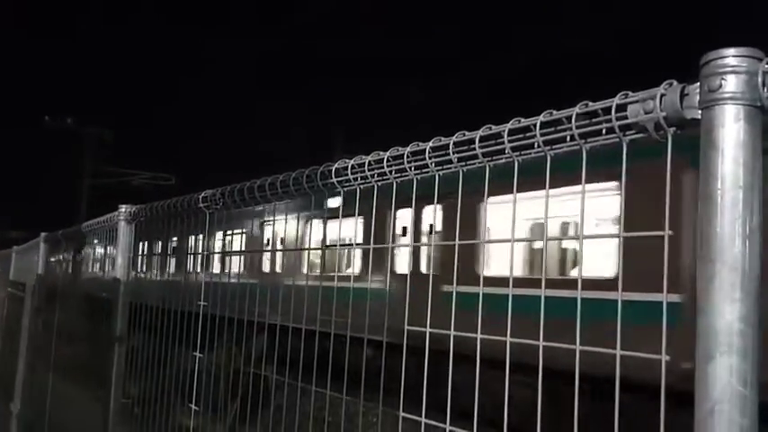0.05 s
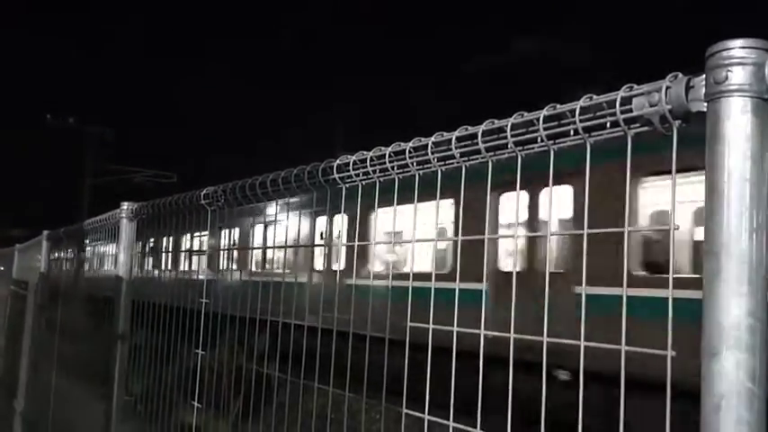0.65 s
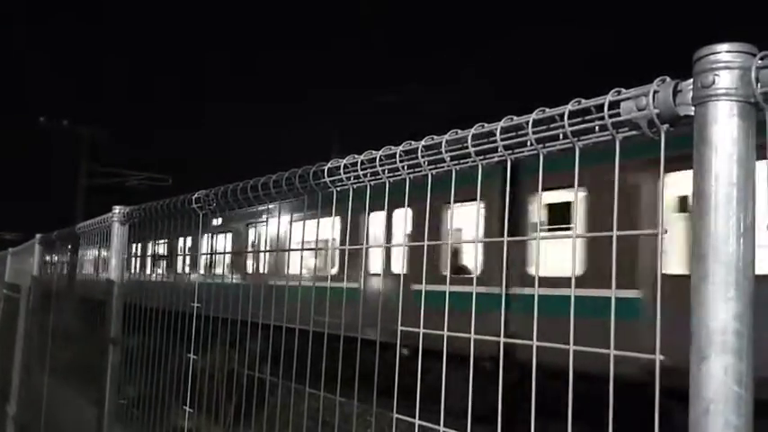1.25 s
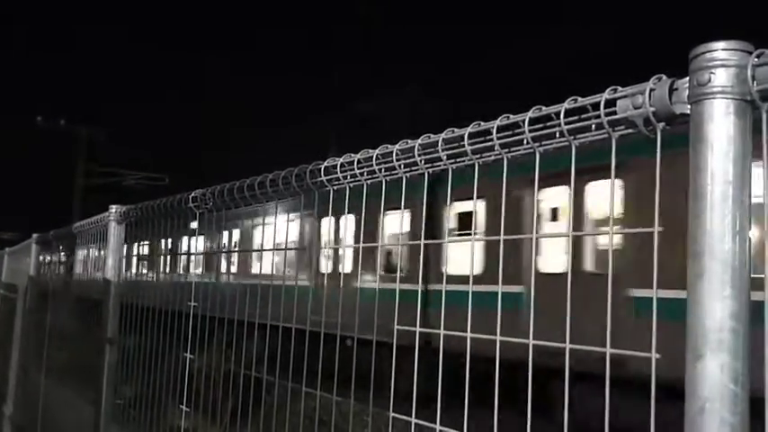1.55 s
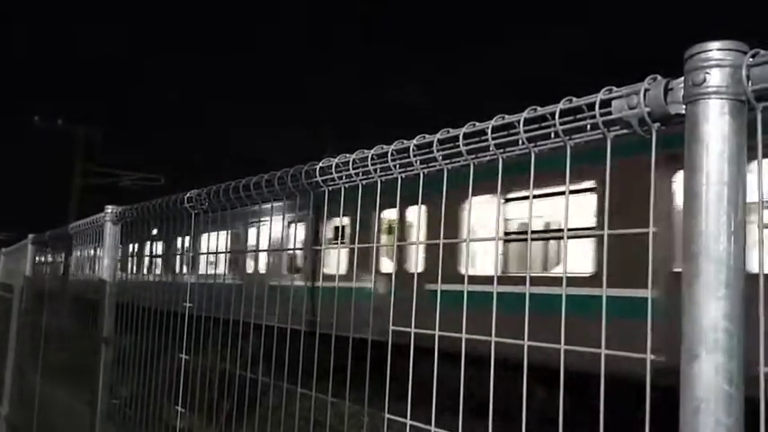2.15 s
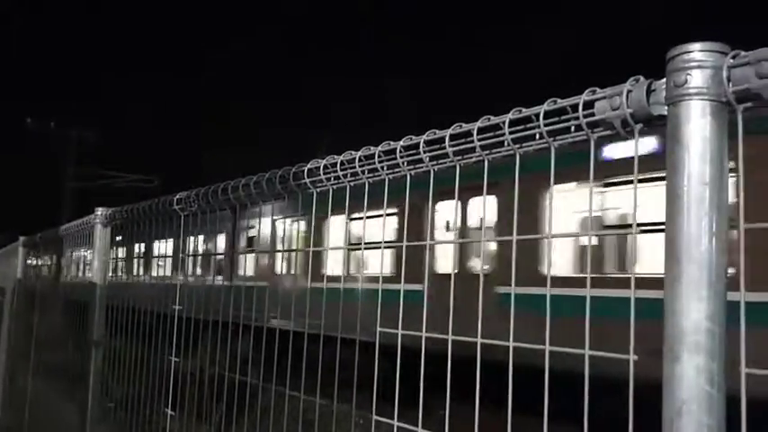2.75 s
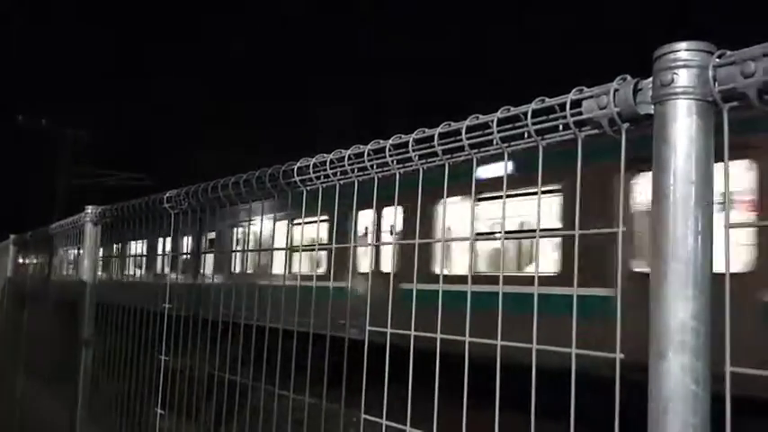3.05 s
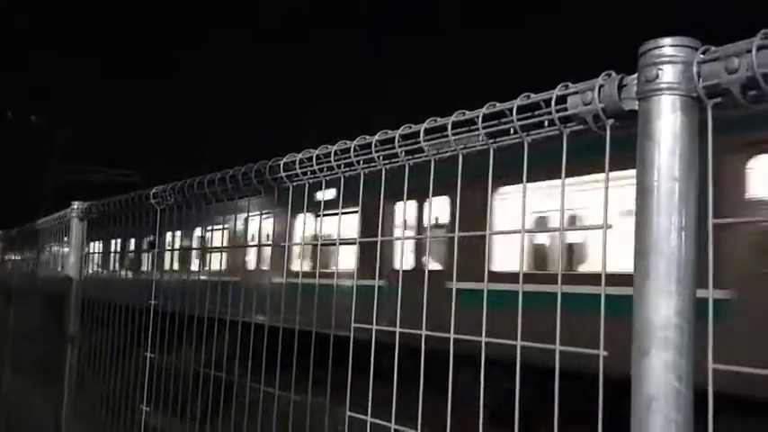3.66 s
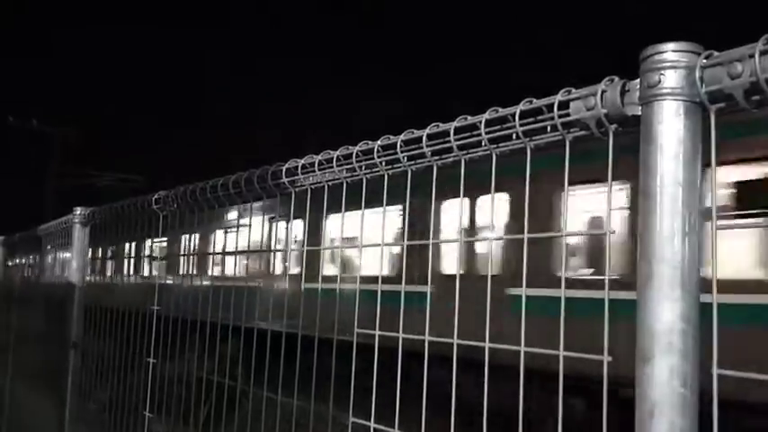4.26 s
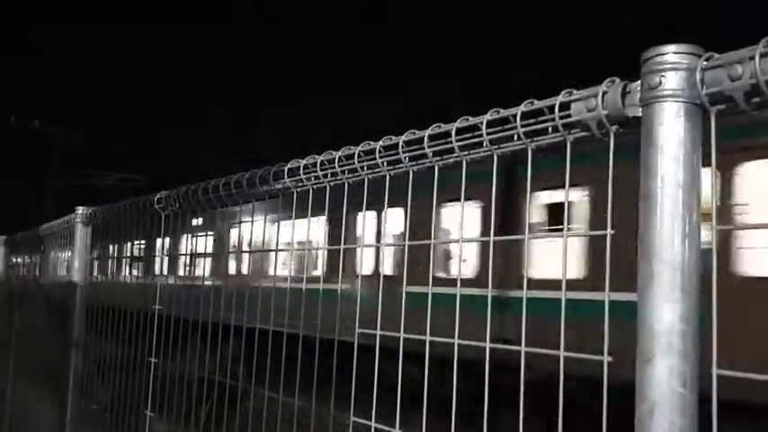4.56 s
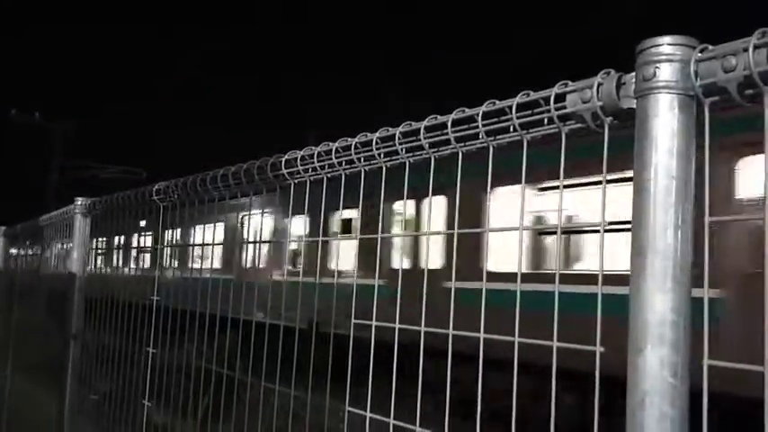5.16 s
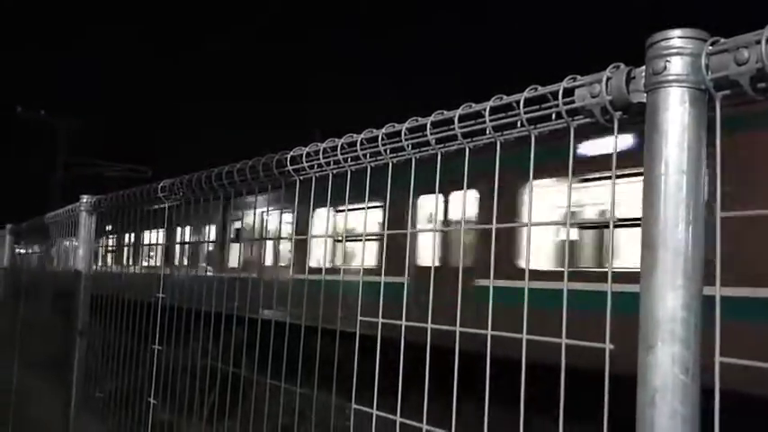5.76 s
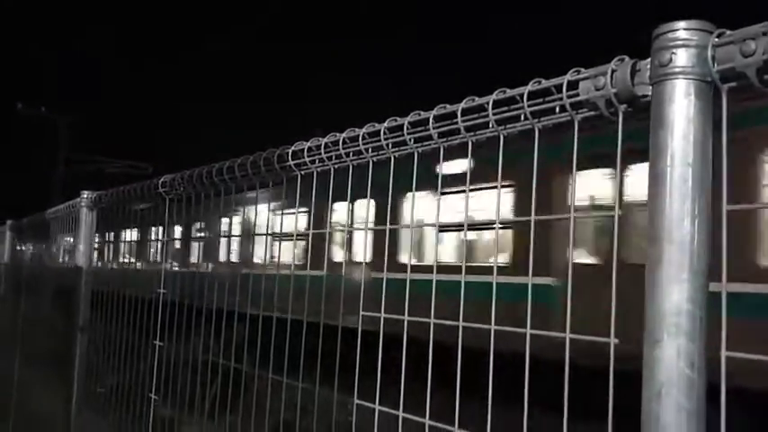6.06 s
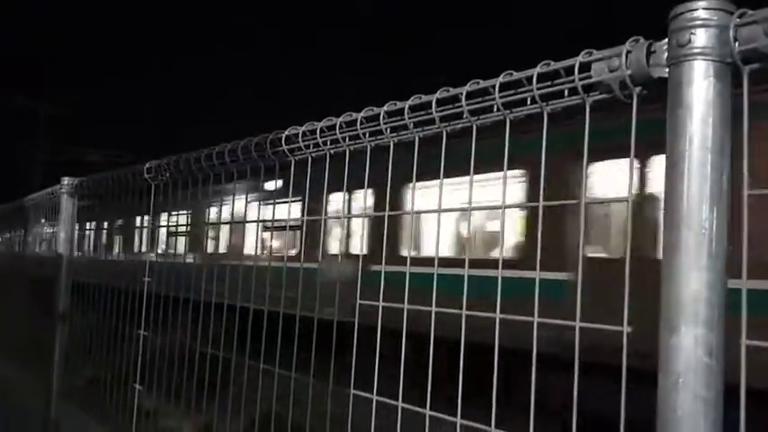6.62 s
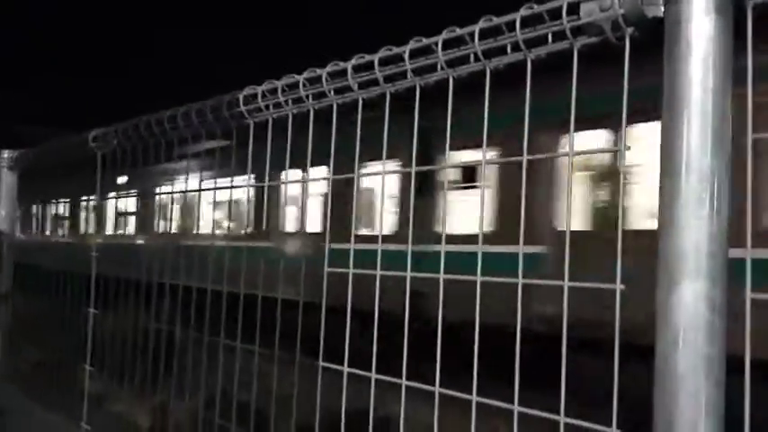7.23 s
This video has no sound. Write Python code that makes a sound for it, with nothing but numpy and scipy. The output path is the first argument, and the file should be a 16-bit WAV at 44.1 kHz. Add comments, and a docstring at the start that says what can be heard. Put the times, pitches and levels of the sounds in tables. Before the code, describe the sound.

Whining motors, rolling rumble and steel hiss from a passing commuter train gathering speed, its wheels thudding and clanking over joints ever harder.

```python
"""Night, a mono microphone at a wire fence; a few metres beyond it an electric commuter train pulls away.
First the gears whine and the motors sing with the inverter, over the rumble, ring and hiss of rolling.
Then, as the train gathers speed, the gear whine climbs and fades and the roar of the rail grows.
All along, wheels drop over rail joints with a thud, a clank and a spray of steel hiss; by the end
the blows come thicker and harder."""
import sys
import numpy as np
from scipy import signal
from scipy.fft import rfft, irfft, next_fast_len
from scipy.io import wavfile

SR = 44100
rng = np.random.default_rng(int(sys.argv[2]) if len(sys.argv) > 2 else 0)


def generate_wav(sig):
    """Save sig (samples, or channels by samples) to the path in sys.argv[1] as 16-bit PCM at SR."""
    pcm = np.round(np.clip(np.atleast_2d(sig).T, -1, 1) * 32767).astype(np.int16)
    wavfile.write(sys.argv[1], SR, pcm)


N = 330309
T = np.arange(N) / SR

# The train pulling away. Each row: time in seconds, speed in m/s.
TRAIN_SPEED = [(0, 4.41), (1.15, 4.91), (3.55, 6.3), (5.8, 7.8), (7.49, 8.97)]
# Bogies crossing a joint. Each row: first axle's time in seconds, thud, clank and hiss in relative dB,
# thud pitch in Hz, dB added to the second axle's thud and clank.
BOGIE_CROSSINGS = [(-.101, -19, -33, -39.5, 242, 1.5), (1.245, -19, -29, -32, 209, -1),
                   (2.636, -26, -40, -34, 176, 2), (3.694, -15.5, -25, -31.5, 179, 0),
                   (3.936, -34, -46, -40, 171, 4), (4.633, -19, -26.5, -29.5, 170, 1.5),
                   (4.812, -27.5, -43.5, -34, 213, 2), (5.668, -22.5, -33.5, -32, 189, -1.5),
                   (6.494, -12.5, -24.5, -28.5, 175, 0.5), (7.243, -14, -22, -31, 176, -4)]
# Lone dull knocks under the cars. Each row: time in seconds, thud and hiss in dB, thud pitch in Hz.
LONE_KNOCKS = [(1.886, -30, -37, 192), (4.382, -33.5, -35, 227.5), (6.194, -26.5, -34.5, 173),
               (6.688, -34, -34.5, 188), (7.049, -21.5, -40, 188), (7.39, -23, -33.5, 215.3)]
# A struck bogie and rail. Each row: mode in Hz, seconds to fall 60 dB, relative level in dB.
CLANK_MODES = [(249.6, 0.091, 3.5), (379, 0.092, -3.5), (436, 0.057, 1.5), (519, 0.067, 0),
               (576, 0.064, -2.5), (683, 0.045, 0), (771, .06, -7), (875, 0.034, -12.5),
               (1095, 0.11, -15.5), (1265, 0.055, -12.5), (1383, 0.11, -14.5), (1580, 0.047, -14.5),
               (2360, 0.085, -24), (2688, 0.18, -17)]
# Rolling between joints. Each row: time in seconds, rumble and hiss in relative dB.
ROLLING_LEVELS = [(0, -32, -33), (1, -32.5, -35), (1.9, -32, -36), (2.5, -34.5, -37), (3.4, -30, -36.5),
                  (4.6, -28.5, -36.5), (5.6, -29.5, -36), (6.4, -28, -34), (7.49, -29, -32.5)]
# Noise colours as heard at the fence. Each row: frequency in Hz, relative spectral density in dB.
RUMBLE_SPECTRUM = [(12, -43), (20, -6.5), (59, -3.5), (113, 3.5), (147, -1.5), (224, -4.5), (330, -16),
                   (430, -47), (730, -120)]
ROAR_SPECTRUM = [(200, -10), (330, -2.5), (430, 1), (600, -1.5), (760, -10), (950, -10), (1250, -19),
                 (2000, -35.5)]
HISS_SPECTRUM = [(1410, -41), (2400, -6.5), (2490, -10.5), (2740, -3.5), (3390, -7.5), (3820, -1),
                 (4120, -2.5), (4490, -1.5), (4870, -0.5), (5450, -3), (7360, -13.5), (7750, -28),
                 (8110, -8.5), (10500, -63), (17800, -120)]
SHUDDER_SPECTRUM = [(80, -20.5), (140, -3), (200, 4.5), (250, -0.5), (330, -10), (700, -18)]
SPRAY_SPECTRUM = [(900, -8), (2000, -6), (3200, -4.5), (4000, 3), (4900, 3), (5450, 5.5),
                  (6500, -3.5), (7500, -10), (8000, -25.5)]
FAN_SPECTRUM = [(520, -0.5), (700, -4), (950, -2), (1250, -4.5), (1500, -12.5)]
# The wheels' steady ring. Each row: resonance in Hz, width in Hz, relative level in dB.
WHEEL_MODES = [(1140, 65, 1), (1453, 66, -3), (1705, 310, -3), (2063, 89, 0.5), (2870, 92, -8.5),
               (2844, 53, 0.5)]
# Gearboxes passing the microphone. Each row: closest moment in seconds, level in dB.
GEARBOX_PASSES = [(0.221, -39), (.58, -40.5), (1.1, -43), (2.35, -45), (3.5, -46.5), (4.15, -47),
                  (6.149, -50), (6.6, -56)]
# Lesser whines of the drives. Each row: peak time and spread in seconds, pitch in Hz, glide in Hz/s,
# level in dB.
DRIVE_WHINES = [(.5, 0.29, 618, 4, -36), (0.801, .5, 890, 8, -48.5), (2.5, 0.57, 660, 35, -50.5),
                (6.7, .9, 709, 56, -47), (7.49, 0.14, 1634, 15, -45)]
# The inverter's switching tone. Each row: time in seconds, pitch in Hz.
INVERTER_PITCH = [(0, 1084), (.7, 1090), (1.9, 1099), (3.2, 1093), (4.2, 1123), (6.3, 1109), (7.2, 1193)]
# Motors passing. Each row: closest moment in seconds, then tone, sidebands and upper tones in dB.
PASSING_MOTORS = [(.25, -34, -38, -41.5), (1.85, -44, -38.5, -46.5), (3.2, -55, -53, -60),
                  (4.7, -47, -47.5, -61.5), (7.1, -51.5, -56.5, -57)]
# Upper motor tones. Each row: multiple of the switching tone, width in Hz, relative level in dB.
UPPER_TONES = [(1.47, 188, -6.5), (2.011, 131, -1.5), (2.53, 196, -3)]
# Faint rings in the hiss. Each row: peak time and spread in seconds, pitch and width in Hz, level in dB.
HIGH_RINGS = [(.1, 0.41, 3790, 220, -48.5), (.3, .6, 5500, 304, -44), (1.7, 0.76, 4450, 260, -42.5),
              (3.3, 1.2, 4110, 196, -51), (4.8, 3.8, 1450, 85, -55), (5.5, 2.9, 5370, 137.7, -47),
              (5.6, 0.83, 4620, 260, -50), (5.6, 2.3, 1984, 151.4, -47.5), (6.82, .35, 5480, 900, -38.5),
              (7.4, .27, 1880, 121, -44.5)]


def rail_joints(thud_s=0.0068, thud_lag_s=0.0013, rebound_s=.048, rebound_db=-10):
    """Each wheel dips into the gap, bounces on the springy track and chatters against the rail end."""
    knocks, shudder, spray = np.zeros((3, N))
    contact = rng.standard_normal(N)
    blows = wheel_blows()
    chances = rng.uniform(-1, 1, (len(blows), len(CLANK_MODES) + 1))
    for (s, thud_db, clank_db, hiss_db, thud_hz), chance in zip(blows, chances):
        near = np.abs(T - s) < .5
        age = T[near] - s
        # the wheel's mass on the track's spring: a few low cycles that build and fade
        rise = np.maximum(age - thud_lag_s, 0) / (2 * thud_s)
        bounce = rise ** 2 * np.exp(2 - 2 * rise)
        knocks[near] += undb(thud_db) * bounce * np.sin(2 * np.pi * thud_hz * age + np.pi * chance[-1])
        shudder[near] += undb(thud_db - 8) * swell(age - .005, rise_s=0.031, fall_s=0.055)
        # the bogie's loose gear rattles, and again on the rebound
        rattle = swell(age, rise_s=0.013, fall_s=0.019)
        rattle += undb(rebound_db) * swell(age - rebound_s, rise_s=0.0023, fall_s=0.037)
        knocks[near] += undb(clank_db + 2.5) * clank(rattle * contact[near], detune=.04 * chance)
        spray[near] += undb(hiss_db) * swell(age - .011, rise_s=0.014, fall_s=0.05)
    return knocks + shudder * coloured(SHUDDER_SPECTRUM) + spray * coloured(SPRAY_SPECTRUM)


def wheel_blows(wheelbase_m=2.07, extra_clank_db=4.5, extra_hiss_db=4.2, knock_clank_db=-38):
    """Each bogie strikes twice, a wheelbase apart, the second time brighter; lone knocks barely ring."""
    blows = []
    for s, thud_db, clank_db, hiss_db, hz, second_db in BOGIE_CROSSINGS:
        later = s + wheelbase_m / speed(s)
        second_clank_db = clank_db + second_db + extra_clank_db
        blows.append((s, thud_db, clank_db, hiss_db, hz))
        blows.append((later, thud_db + second_db, second_clank_db, hiss_db + extra_hiss_db, hz))
    return blows + [(s, thud_db, knock_clank_db, hiss_db, hz) for s, thud_db, hiss_db, hz in LONE_KNOCKS]


def clank(chatter, detune):
    """A rattling contact rings bogie and rail, tuned a little differently at each blow."""
    t = np.arange(SR // 5) / SR
    body = sum((-1) ** k * undb(db - 60 * t / t60) * np.sin(2 * np.pi * hz * (1 + detune[k]) * t)
               for k, (hz, t60, db) in enumerate(CLANK_MODES))
    body /= np.sqrt(np.sum(body ** 2))
    return signal.fftconvolve(chatter, body)[:len(chatter)]


def rolling(roar_db_per_doubling=10):
    """Rough steel on steel shakes the track, rings the wheels and hisses; the roar grows with speed."""
    rumble_db, hiss_db = curves(ROLLING_LEVELS)
    roar_db = -42.5 + roar_db_per_doubling * np.log2(speed(T) / 6.13)
    rumble = undb(rumble_db + 1.52 + 1.5 * wander(7.4)) * coloured(RUMBLE_SPECTRUM)
    roar = undb(roar_db + 1.3 * wander(14)) * coloured(ROAR_SPECTRUM)
    wheels = shaped_noise(lambda hz: np.sqrt(sum((undb(db) * resonance(hz, centre, width)) ** 2
                                                 for centre, width, db in WHEEL_MODES)))
    ring = undb(hiss_db - 8 + 1.2 * wander(8.5)) * wheels
    hiss = undb(hiss_db - 0.5 + 0.63 * wander(22)) * coloured(HISS_SPECTRUM)
    return rumble + roar + ring + hiss


def gears(teeth_per_m=104.8, reach_m=0.61, distant_db=-54):
    """Meshing teeth whine higher with speed, louder as each gearbox passes; lesser whines come and go."""
    close = sum(undb(db) * bell(metres_past(s), reach_m) for s, db in GEARBOX_PASSES)
    whine = (undb(distant_db) + close) * blurred_tone(teeth_per_m * speed(T), width_hz=27.4, scatter=2.1)
    for s, spread, hz, glide, db in DRIVE_WHINES:
        pitch = hz + glide * (T - s)
        whine += undb(db) * bell(T - s, spread) * blurred_tone(pitch, width_hz=15, scatter=0.8)
    return whine


def motors(reach_m=5.45, fan_db=3.0):
    """Switching tone, sidebands, upper tones and fans swell as each motor passes the microphone."""
    hz, = curves(INVERTER_PITCH)
    # a motor is 6 dB down at reach_m along the track
    power = sum(np.outer(undb(levels), 1 / (1 + (metres_past(s) / reach_m) ** 2)) ** 2
                for s, *levels in PASSING_MOTORS)
    tone_gain, sideband_gain, upper_gain = np.sqrt(power)
    tones = tone_gain * blurred_tone(hz, width_hz=26, scatter=0.79)
    tones += sideband_gain * blurred_tone(hz, width_hz=106, scatter=26)
    for multiple, width, db in UPPER_TONES:
        tones += upper_gain * undb(db) * blurred_tone(hz * multiple, width, scatter=6.0)
    fans = upper_gain * undb(fan_db) * coloured(FAN_SPECTRUM)
    return tones + fans


def high_rings():
    """Faint, high, narrow rings swell and fade in the hiss."""
    rings = np.zeros(N)
    for s, spread, centre, width, db in HIGH_RINGS:
        ring = shaped_noise(lambda hz: resonance(hz, centre, width) ** 2)
        rings += undb(db) * bell(T - s, spread) * ring
    return rings


def speed(s):
    """The train's speed in m/s at time s."""
    return np.interp(s, *np.transpose(TRAIN_SPEED))


def metres_past(s):
    """Distance beyond the microphone of the part of the train that passes at time s."""
    travelled = np.cumsum(speed(T)) / SR
    return travelled - np.interp(s, T, travelled)


def blurred_tone(hz, width_hz, scatter):
    """A tone reaching the microphone directly and over many changing paths, which blur it."""
    blur = (wander(width_hz / 2) + 1j * wander(width_hz / 2)) / np.sqrt(2)
    direct = np.exp(2j * np.pi * np.cumsum(hz) / SR)
    return unit_rms(np.real((1 + scatter * blur) * direct))


def shaped_noise(gain):
    """Noise of rms 1 whose spectrum follows gain(Hz)."""
    size = next_fast_len(N, True)
    hz = np.maximum(np.fft.rfftfreq(size, 1 / SR), 1)
    return unit_rms(irfft(rfft(rng.standard_normal(size)) * gain(hz), size)[:N])


def coloured(spectrum):
    """Noise that follows a spectrum table and falls away beyond its ends."""
    f, db = np.transpose(spectrum)
    return shaped_noise(lambda hz: undb(np.interp(np.log(hz), np.log(f), db))
                        * np.minimum(1, np.minimum(hz / f[0], f[-1] / hz)) ** 2)


def wander(rate):
    """A smooth random drift of rms 1 that moves about rate times a second."""
    return shaped_noise(lambda hz: 1 / (1 + (hz / rate) ** 4))


def resonance(hz, centre, width):
    """Gain of one resonance."""
    return 1 / np.sqrt(1 + ((hz / centre - centre / hz) * centre / width) ** 2)


def swell(t, rise_s, fall_s):
    """Grows up to time 0 and dies away after it."""
    return np.exp(np.minimum(t / rise_s, -t / fall_s))


def bell(offset, spread):
    """A smooth rise and fall around offset 0."""
    return np.exp(-.5 * (offset / spread) ** 2)


def curves(table):
    """A table's columns, joined by straight lines in time."""
    s, *columns = np.transpose(table)
    return [np.interp(T, s, column) for column in columns]


def undb(db):
    """Decibels to gain."""
    return 10 ** (np.asarray(db) / 20)


def unit_rms(x):
    """Scale to rms 1."""
    return x / np.sqrt(np.mean(x ** 2))


def scene():
    """The whole train from the fence, the same in both channels."""
    train = gears() + motors() + high_rings() + rolling() + rail_joints()
    return np.array([train, train])


def record(dry):
    """The narrow-band microphone rounds the loudest peaks and loses the deepest bass and top treble."""
    ceiling, bottom_hz, top_hz = .6, 18, 7800
    rounded = ceiling * np.tanh(dry / ceiling)
    trimmed = signal.sosfilt(signal.butter(2, bottom_hz, "high", fs=SR, output="sos"), rounded)
    return signal.sosfilt(signal.ellip(10, .2, 80, top_hz, fs=SR, output="sos"), trimmed)


dry = scene()
out = record(dry)
generate_wav(out)
```